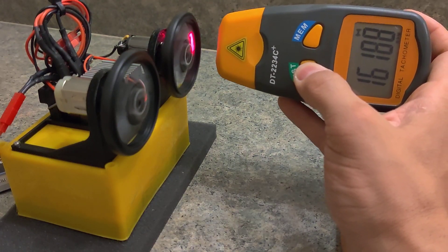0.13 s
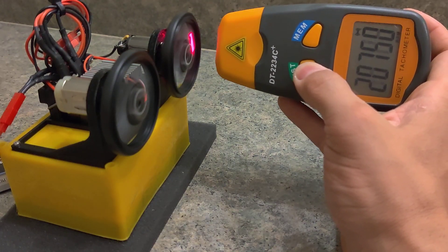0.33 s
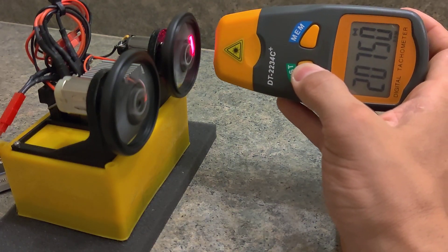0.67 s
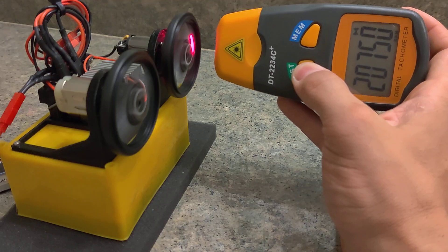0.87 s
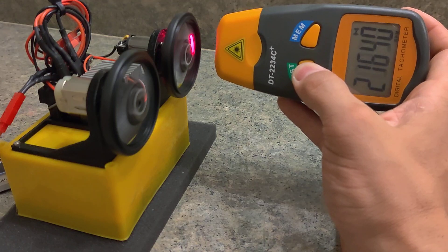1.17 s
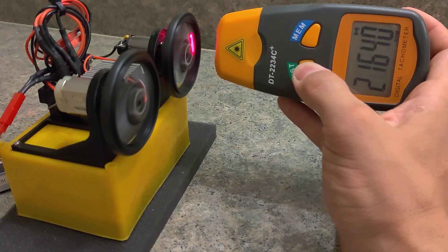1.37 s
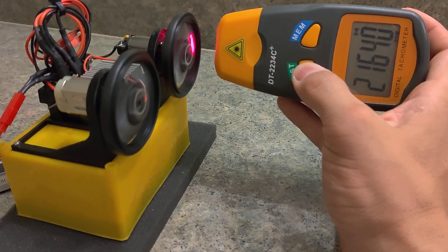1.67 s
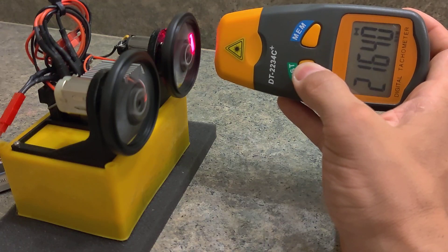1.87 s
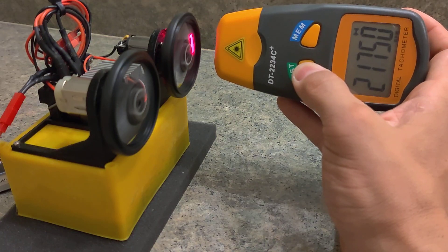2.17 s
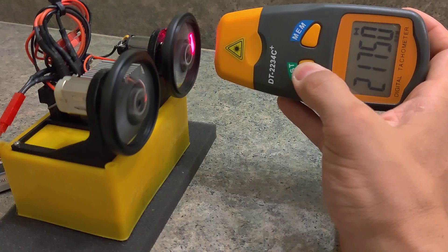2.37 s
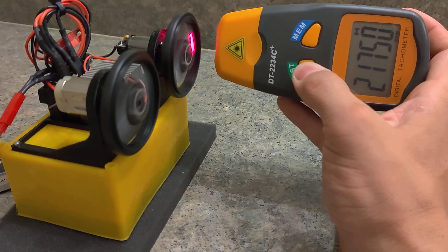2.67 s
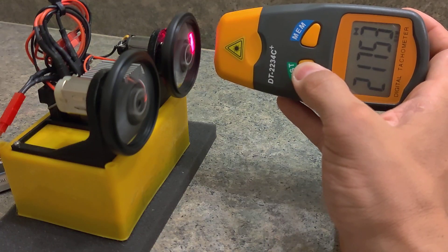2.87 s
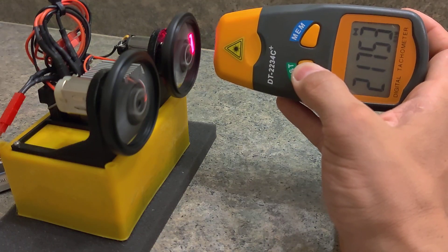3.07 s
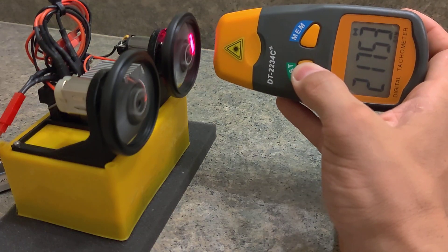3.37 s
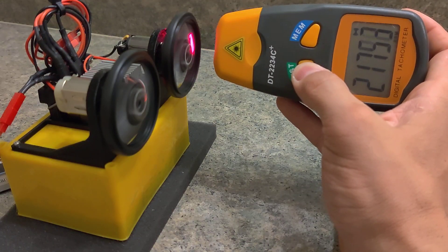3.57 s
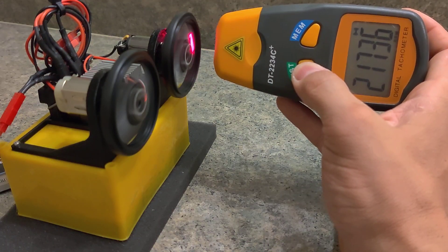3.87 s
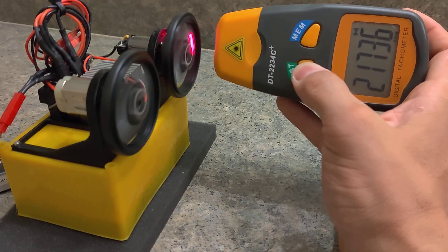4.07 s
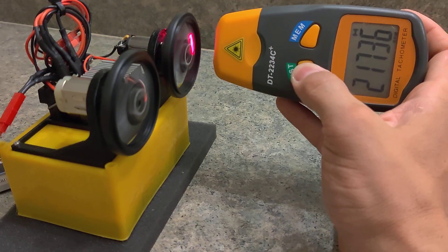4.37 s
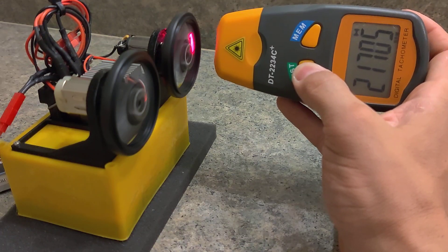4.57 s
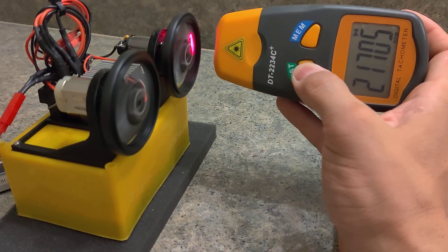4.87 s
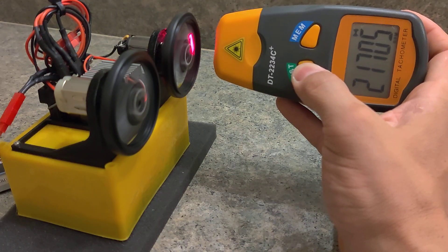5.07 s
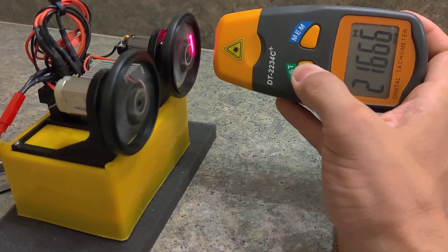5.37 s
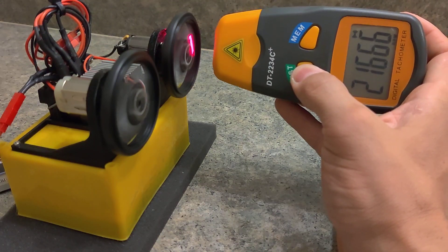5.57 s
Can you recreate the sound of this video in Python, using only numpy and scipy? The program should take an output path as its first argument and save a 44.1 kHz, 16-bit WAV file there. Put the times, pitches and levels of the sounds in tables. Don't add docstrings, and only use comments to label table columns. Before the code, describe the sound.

Continuous loud motor drone, already running at the start. The pitch edges up for about a second, settles, and sags almost imperceptibly. Buzzing tones beat and flutter against each other over a wide, gritty hiss coloured by a plastic housing. Close, dry stereo microphones, slightly different on each side, with hardly any room. Right at the end the whine begins falling as the motor coasts.

```python
import sys
import numpy as np
from scipy import signal
from scipy.io import wavfile
from scipy.ndimage import uniform_filter1d

SR = 44100
rng = np.random.default_rng(int(sys.argv[2]) if len(sys.argv) > 2 else 0)


def natural_amplitude(level_db):
    exponent = np.asarray(level_db, float) / 20
    return 10 ** exponent


def to_wav(sig):
    pcm = np.clip(np.atleast_2d(sig), -1, 1) * 32767
    pcm = np.round(pcm).astype(np.int16)
    wavfile.write(sys.argv[1], SR, pcm.T)


N = 252252
T = np.arange(N) / SR
COARSE = T[::4]

SHAFT_HZ, SHAFT_GAP_HZ, SHAFT_SETTLE_S = 362.8, 11.9, .431
SAG_HZ_PER_S2, FRESH_S = .125, 1.14
CAGE_HZ, CAGE_GAP_HZ, CAGE_SETTLE_S, CREEP_HZ_PER_S = 195.64, 4.5, .308, .318
POWER_OFF_S, DRAG_PER_S = 5.401, .768
WOBBLE_HZ, WOBBLE_DEPTH_HZ = 3.44, .28


def columns(table, at, warp=lambda v: v):
    first, *rest = np.transpose(table)
    return np.array([np.interp(warp(at), warp(first), c) for c in rest])


def drift(count, top_hz, at):
    hz = np.geomspace(top_hz / 20, top_hz, num=12)
    coarse = T[::128]
    phase = 2 * np.pi * rng.random((count, len(hz), 1))
    sines = np.sin(2 * np.pi * hz[:, None] * coarse + phase)
    slow = (sines / np.sqrt(hz[:, None])).sum(1)
    return np.array([np.interp(at, coarse, s / s.std()) for s in slow])


def speeds(t):
    shaft = SHAFT_HZ - SHAFT_GAP_HZ * np.exp(-t / SHAFT_SETTLE_S) - SAG_HZ_PER_S2 * (t - FRESH_S) ** 2
    shaft = shaft - WOBBLE_DEPTH_HZ * np.cos(2 * np.pi * WOBBLE_HZ * t)
    cage = CAGE_HZ - CAGE_GAP_HZ * np.exp(-t / CAGE_SETTLE_S) + CREEP_HZ_PER_S * t
    return np.array([shaft, cage]) / (1 + DRAG_PER_S * np.maximum(t - POWER_OFF_S, 0))


def angles(shaft_jitter_hz=.08, cage_jitter_hz=.2):
    jitter_hz = np.array([[shaft_jitter_hz], [cage_jitter_hz]])
    speed = speeds(T) + jitter_hz * drift(count=2, top_hz=8, at=T)
    return 2 * np.pi * np.cumsum(speed, axis=1) / SR


# shaft multiple, cage multiple, left level/dB, right level/dB, left phase lead/rad
TONES = [(1, -1, -48.7, -50.9, -0.1), (0, 1, -41.1, -40.2, 0.6), (0, 2, -40.5, -44.9, 0.4),
         (2, -1, -44.9, -50.8, 2.3), (1, 1, -43.8, -40.6, -2.1), (0, 3, -38.0, -37.5, 0.3),
         (2, 0, -21.7, -24.6, 0.2), (1, 2, -30.4, -30.2, -0.1), (3, -1, -41.8, -38.3, 0.2),
         (2, 1, -36.1, -44.8, 1.1), (1, 3, -42.5, -42.2, 0.4), (4, -2, -46.8, -41.1, 0.7),
         (3, 0, -38.1, -31.7, 2.3), (3, 1, -54.0, -39.1, 0.4), (4, 0, -40.6, -39.2, 1.3),
         (5, 0, -39.8, -45.1, 2.9), (4, 2, -42.0, -44.1, -0.8), (6, -1, -39.4, -41.5, 2.7),
         (5, 1, -35.4, -35.0, 2.6), (6, 0, -40.8, -50.4, 2.3), (5, 5, -41.3, -53.5, 2.0),
         (8, 1, -45.1, -41.6, 2.4), (9, 0, -45.7, -39.9, 2.6), (10, 1, -39.7, -40.9, 2.2)]
# shaft f/Hz, then level/dB of twice shaft, higher shaft, cage, rattle
HOUSING_BY_SPEED = [(290, -5, 5.5, 10.5, -9), (321, -9.5, 3, 5.5, -6), (336, -3, -7, -2, -3),
                    (352, -3.5, -2, 0, -2), (356.7, -1, -0.5, 0, 1), (361.7, 2, 3, 1.5, -0.5),
                    (363, 0.5, .7, -1.5, 1), (360.6, -0.1, 0.5, .1, 0.04)]
# peak t/s, spread t/s, level/dB
SIXTH_SWELL = (5.42, 0.2, 12)


def whine(shaft, cage, flutter_db=1.1, wobble_db=0.3, loose_wobble_db=-0.63):
    twice, higher, slow, rattle = columns(HOUSING_BY_SPEED, speeds(COARSE)[0])
    peak_s, spread_s, swell_db = SIXTH_SWELL
    sixth = swell_db * np.exp(-((COARSE - peak_s) / spread_s) ** 2)
    loosening = 0.44 * (COARSE - 3)
    steady = {(2, 0): twice, (3, 0): higher, (4, 0): higher, (6, 0): sixth,
              (0, 1): slow, (1, 2): rattle + loosening}
    flutter = drift(count=len(TONES), top_hz=14, at=COARSE)
    start = {(m, n): 2 * np.pi * rng.random() for m, n, *_ in TONES}
    start[0, 1] = start[1, -1] - .9
    start[1, 2] = start[2, 0]
    start[0, 2] = -.4
    rocking = np.cos(2 * np.pi * WOBBLE_HZ * COARSE + 0.15)
    out = np.zeros((2, len(COARSE)))
    for k, (m, n, left_db, right_db, lead) in enumerate(TONES):
        loose = rattle + flutter_db * flutter[k] + loose_wobble_db * rocking
        swing = steady.get((m, n), loose) + wobble_db * rocking
        turn = m * shaft + n * cage + start[m, n] + np.array([[lead], [0]])
        out += np.sqrt(2) * natural_amplitude([[left_db], [right_db]]) * natural_amplitude(swing) * np.cos(turn)
    return out


def chatter(shaft, cage, level_db=-49, spread_db=4.0, flutter_db=4.0):
    shafts, cages = np.arange(3, 13), np.arange(-2, 5)
    size = natural_amplitude(level_db + spread_db * rng.standard_normal((len(cages), 2, len(shafts))))
    size = size * np.exp(2j * np.pi * rng.random(size.shape))
    for m, n, *_ in TONES:
        size[np.ix_(cages == n, [0, 1], shafts == m)] = 0
    comb = np.exp(1j * shafts[:, None] * shaft)
    rattle_db = columns(HOUSING_BY_SPEED, speeds(COARSE)[0])[-1]
    flutter = natural_amplitude(flutter_db * drift(count=len(cages), top_hz=10, at=COARSE) + rattle_db)
    out = np.zeros((2, len(COARSE)))
    for n, s, f in zip(cages, size, flutter):
        out += np.sqrt(2) * f * (s @ comb * np.exp(1j * n * cage)).real
    return out


# f/Hz, left level/dB per Hz, right level/dB per Hz
HUM = [(20, -63, -68), (60, -75, -73.5), (111, -69, -66.5), (170, -67.5, -68.5), (256, -70.5, -74),
       (334, -63, -79), (404, -77, -66.5), (458, -60, -65), (504, -58, -56.5), (552, -59, -66.5),
       (830, -55.5, -50.5), (980, -56, -56), (1150, -58.6, -60.5)]
# f/Hz, left level/dB per Hz, right level/dB per Hz
HISS = [(1200, -58, -63), (1550, -58.5, -59.5), (2040, -55, -58.5), (3000, -52, -54.5),
        (3360, -54.5, -55.5), (4220, -55.5, -55.5), (5280, -52.5, -50), (6190, -50, -48.5),
        (7000, -57, -53), (8090, -64, -60.5), (10000, -62.5, -68.5), (11770, -60.5, -62.5),
        (13270, -59.5, -60), (13600, -64, -63)]
# f/Hz, width f/Hz, left level/dB, right level/dB
HOUSING = [(485, 70, -6, 1), (1364, 130, -2.5, -2), (2410, 52, -2, 3.5), (2520, 180, -4.5, -0.5),
           (2780, 180, 0.5, 0.7), (3200, 63, -4.5, -4), (3496, 38, 4.5, 7.5), (4227, 120, 4.5, 7),
           (4770, 150, 3, 0), (6280, 120, -2, -0.5), (8480, 470, 1.5, 2.5), (9130, 290, 9.5, -5),
           (10980, 400, -3.5, 6.5), (12700, 900, 1.5, -3), (13555, 70, 2, 5)]
# f/Hz, likeness (0-1)
SAME = [(20, .4), (60, 0.9), (170, 0.8), (240, 0.94), (380, 0.6), (520, 0.65), (760, 0.74), (1050, 0.8),
        (1200, 0.42), (2000, 0.27), (4000, 0.07), (8000, 0.03), (15000, 0)]
# f/Hz, width f/Hz, onset shaft f/Hz, level/dB per shaft Hz
VALLEY = (480, 75, 360.6, -6)


def rush(shaft, cage, patchy_db=0.51, ripple_db=0.36, gust_db=0.28, beat_pulse=0.052, cage_pulse=0.068):
    hz, t, z = signal.stft(rng.standard_normal((2, N)), SR, nperseg=2048, noverlap=1536)
    same = np.clip(columns(SAME, hz + 1, np.log)[0], 0, 1)[:, None]
    hum_share = np.clip(2 - hz / 1000, 0, 1)[:, None]
    lead_s = 0.00019 * (1 - hum_share * (1 - 0.61))
    late = np.exp(-2j * np.pi * hz[:, None] * lead_s)
    z = np.array([z[0], same * late * z[0] + np.sqrt(1 - same ** 2) * z[1]])

    colour = columns([*HUM[:-1], *HISS], hz + 1, np.log)
    for centre_hz, width_hz, *db in HOUSING:
        colour += np.array(db)[:, None] * np.exp(-((hz - centre_hz) / width_hz * 2) ** 2)
    ripple = uniform_filter1d(rng.standard_normal((2, len(hz))), size=5)
    colour += ripple_db * ripple / ripple.std() * (hz > HISS[0][0])

    shaft_hz = speeds(t)[0]
    speed_db = 20 * np.log10(shaft_hz / SHAFT_HZ)
    hiss, hum = 0.95 * speed_db, -2 * speed_db
    patches = uniform_filter1d(rng.standard_normal(z.shape), size=24, axis=1)
    patches = uniform_filter1d(patches, size=6, axis=2)
    field = colour[:, :, None] + hiss + hum_share * hum + patchy_db * patches / patches.std()
    valley_hz, width_hz, from_hz, db_per_hz = VALLEY
    valley = np.exp(-((hz[:, None] - valley_hz) / width_hz * 2) ** 2)
    field += valley * db_per_hz * np.maximum(shaft_hz - from_hz, 0)

    z = z * natural_amplitude(field) * np.sqrt(SR / 2)
    noise = signal.istft(z, SR, nperseg=2048, noverlap=1536)[1][:, :N]
    pulse = 1 + (cage_pulse + beat_pulse * np.cos(shaft)) * np.cos(cage)
    gusts = gust_db * drift(count=1, top_hz=39.97, at=T) + 0.12 * np.cos(2 * np.pi * WOBBLE_HZ * T)
    return noise * pulse * natural_amplitude(gusts)


# f/Hz, width f/Hz, left level/dB, left phase/rad, right level/dB, right phase/rad
MOUNT = [
    (345.08, 5.73, -24.34, 2.27, -17.37, 1.57),
    (360.52, 10.24, -17.42, -1.09, -23.37, -1.46),
    (397.31, 41.27, -5.39, 1.69, -10.58, 1.9),
]
# left level/dB, left phase/rad, right level/dB, right phase/rad
DIRECT = (-20.02, 0, -21.61, .22)


def mount(shaft, size=100):
    def ports(row):
        return natural_amplitude(row[::2])[:, None] * np.exp(1j * np.array(row[1::2]))[:, None]

    push = np.exp(1j * shaft[::size])
    heard = ports(DIRECT) * np.ones(len(push))
    for hz, width_hz, *row in MOUNT:
        r = np.exp(-np.pi * width_hz * size / SR)
        pole = r * np.exp(2j * np.pi * hz * size / SR)
        settled = pole * (1 - r) * push[0] / (push[1] / push[0] - pole)
        ringing = signal.lfilter([1 - r], [1, -pole], push, zi=[settled])[0]
        heard = heard + ports(row) * ringing / push
    envelope = np.array([np.interp(T, T[::size], h) for h in heard])
    return np.sqrt(2) * (envelope * np.exp(1j * shaft)).real


def scene():
    shaft, cage = angles()
    slow = shaft[::4], cage[::4]
    tones = natural_amplitude(0.1) * whine(*slow) + chatter(*slow)
    tones = signal.resample_poly(tones, 4, 1, axis=1)
    return tones + natural_amplitude(-0.57) * rush(shaft, cage) + natural_amplitude(0.33) * mount(shaft)


def denoise(x, from_hz=7100, depth=2.2, makeup_db=2.1):
    hz, _, z = signal.stft(x, SR, nperseg=2048, noverlap=1536)
    power = uniform_filter1d((abs(z) ** 2).sum(0), size=4, axis=1) + 1e-20
    around = uniform_filter1d(uniform_filter1d(power, size=25, axis=0), size=13, axis=1)
    keep = natural_amplitude(makeup_db) * np.clip(power / around, 0, 1) ** depth
    z = z * np.where(hz[:, None] > from_hz, keep, 1)
    return signal.istft(z, SR, nperseg=2048, noverlap=1536)[1][:, :N]


def roll_off(x):
    return signal.sosfilt(signal.butter(12, 15490, fs=SR, output="sos"), x)


def record(dry):
    rounded = dry / (1 + abs(dry) ** 10) ** (1 / 10)
    return roll_off(denoise(rounded))


dry = scene()
out = record(dry)
to_wav(out)
```